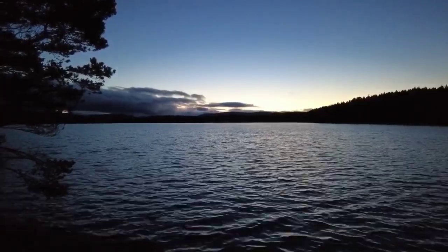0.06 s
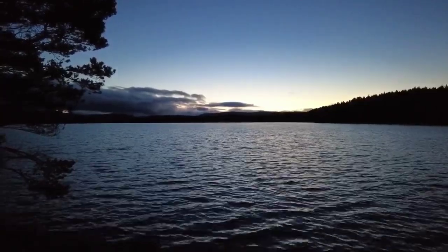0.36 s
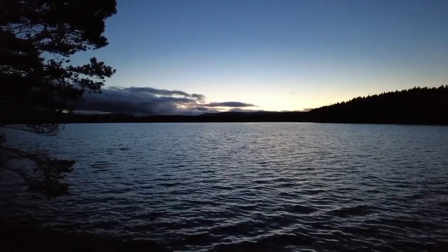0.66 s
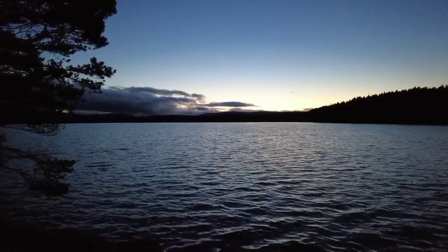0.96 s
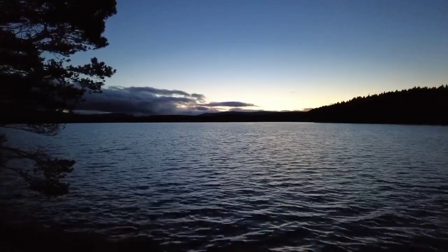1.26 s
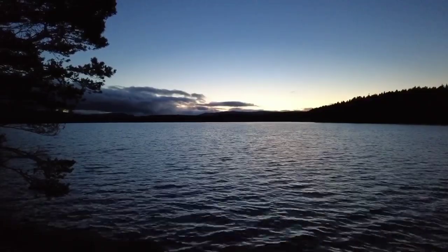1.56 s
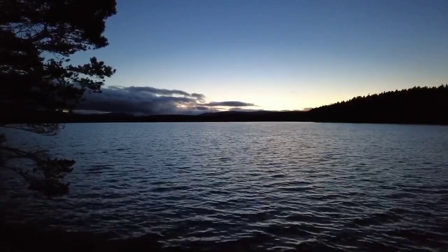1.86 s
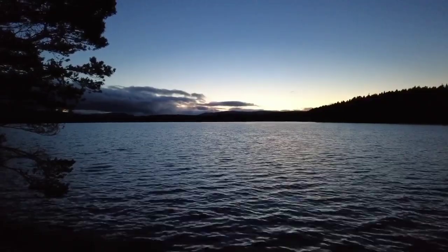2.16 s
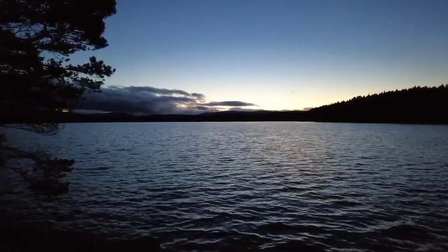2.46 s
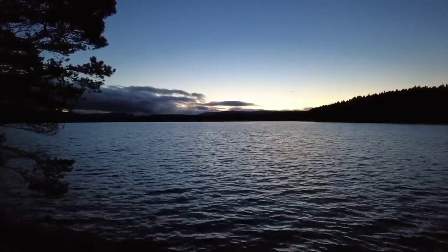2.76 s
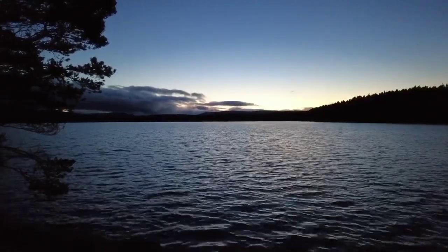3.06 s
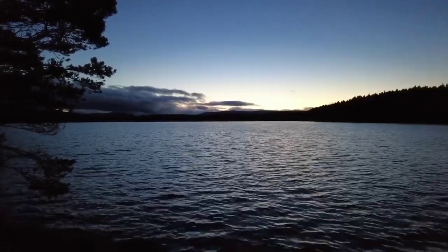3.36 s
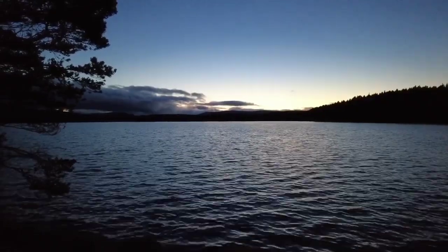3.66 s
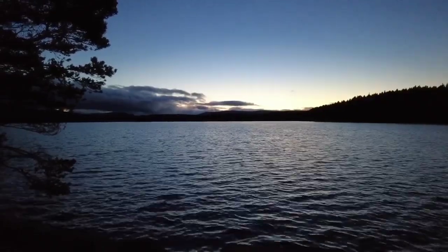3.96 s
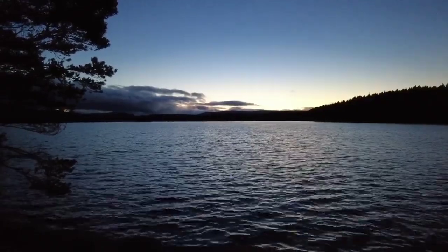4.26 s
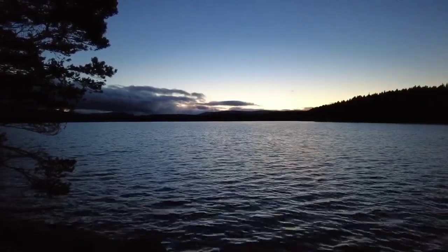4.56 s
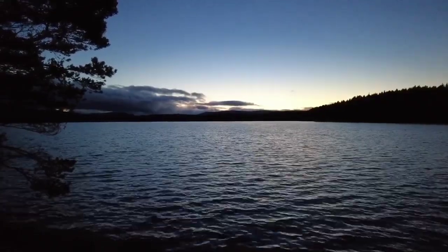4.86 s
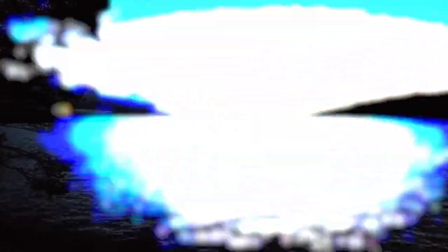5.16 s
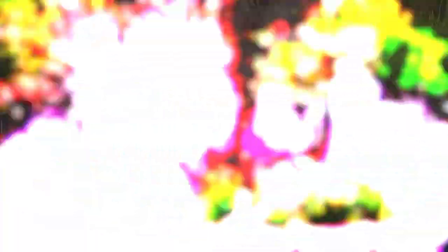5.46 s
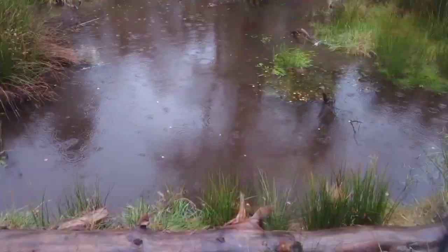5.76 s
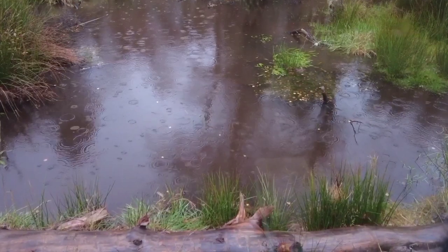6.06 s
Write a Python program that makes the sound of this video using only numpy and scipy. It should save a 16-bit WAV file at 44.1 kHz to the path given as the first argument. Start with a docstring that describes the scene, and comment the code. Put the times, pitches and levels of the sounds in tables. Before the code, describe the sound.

Small lake waves lap close to the microphone, gurgling and plopping among the stones with little splashes. A soft wash of ripples lies farther out, while a breeze hushes faintly in the pines and rumbles on the microphone. The lake cuts off with a brief low thump. After a short silence, light rain ticks and plinks on a pond.

```python
"""Lake shore, then rain on a pond

Close to the microphone small waves gurgle up the stones, trapping air that rings as bubbles; some splash.
Farther out lies a soft wash of ripples. A breeze hushes in the pines and rumbles on the microphone.
The lake cuts off with a brief low thump; after a short silence, light rain ticks and plinks on a pond."""
import sys
import numpy as np
from scipy import signal
from scipy.fft import rfft, irfft, next_fast_len
from scipy.io import wavfile
from scipy.ndimage import uniform_filter1d, map_coordinates

SR = 44100
rng = np.random.default_rng(int(sys.argv[2]) if len(sys.argv) > 2 else 0)


def bounce(signal):
    """Save signal as a 16-bit WAV file at the path given by the first command-line argument."""
    frames = np.transpose(np.atleast_2d(signal))
    limited = np.clip(frames, -1, 1)
    pcm = np.round(limited * 32767).astype(np.int16)
    wavfile.write(sys.argv[1], SR, pcm)


N = 278271
LAKE_END, RAIN_START = 5.313, 5.571  # s

# Small waves running up the shore. Each row: arrival in seconds, strength in dB, seconds on the stones.
WAVES = [(0.06, -57, 0.03), (0.19, -55, 0.082), (0.44, -65, 0.17), (0.72, -58, .04), (1.07, -79, 0.066),
         (1.235, -56.5, 0.025), (1.491, -57.5, 0.034), (1.899, -60.5, 0.11), (2.171, -61.5, 0.13),
         (2.62, -60, 0.11), (2.841, -60, 0.17), (3.16, -58, 0.085), (3.33, -57, 0.06), (3.52, -61.5, 0.022),
         (3.72, -61, 0.041), (3.9, -58.5, 0.054), (4.171, -65, 0.17), (4.565, -59.5, 0.051),
         (4.82, -59, 0.26)]
# Swell and ebb of the water farther along the shore. Each row: time in seconds, level in dB.
WASH_LEVEL = [(0.0, -63.5), (0.3, -67.5), (0.55, -69), (0.72, -65.5), (1.0, -70.5), (1.08, -68.5),
              (1.35, -69), (1.54, -64), (1.76, -77.5), (1.93, -65), (2.1, -68), (2.45, -67), (2.72, -66),
              (3.05, -68.5), (3.2, -66.5), (3.7, -69.5), (4.15, -68), (4.37, -64), (4.48, -78),
              (4.57, -66.5), (4.7, -68.5), (4.93, -63.5), (5.13, -70.5), (5.3, -65)]
# Stereo width at the lake and at the pond. Each row: frequency in Hz, side level against mid in dB.
LAKE_WIDTH = [(40, -27), (110, -14.5), (200, -9.5), (380, -6.5), (700, 1), (980, 10), (1350, -3),
              (2000, -1), (3000, 2.5), (4500, -1.5), (6500, -3), (15000, -4.5)]
POND_WIDTH = [(60, -20), (180, -14), (300, -10), (500, -5.5), (950, 5.5), (1350, -10), (2500, -12),
              (4300, 1.5), (10000, -4.5)]


def plops(brood_db=-14, brood_lag_s=.008, brood_t60=.011, flutter_db=1.5, smack_db=-13, smack_s=.0018):
    """Close by, air pockets shut with a wet smack, then ring on or choke amid a brood of small bubbles."""
    # Large air pockets. Each row: start in seconds, level in dB, pitch in Hz, t60 in seconds,
    # climb in octaves per 20 ms.
    pockets = [(0.0446, -38.5, 1300, 0.0055, -0.055), (0.071, -40, 810, 0.08, 0.23),
               (0.173, -54, 765, 0.15, 0.14), (0.207, -51.5, 1100, 0.044, -0.26),
               (0.263, -53.5, 1025, 0.094, 0.0058), (0.4361, -38, 1423, 0.042, 0.5),
               (0.492, -50, 2130, 0.023, 0.094), (0.537, -53.5, 1620, 0.036, 0.28),
               (0.6923, -44, 1570, 0.0039, 0), (0.6972, -41, 1490, 0.0073, 0),
               (0.736, -47, 1280, 0.013, .2), (1.064, -54, 1373, 0.057, 0.14),
               (1.117, -51.5, 2030, 0.015, .3), (1.145, -56.5, 1800, 0.024, -0.19),
               (1.17, -57, 583, 0.084, 0.091), (1.2, -58, 894, 0.1, 0.3), (1.231, -53, 1980, 0.034, 0.11),
               (1.252, -55.5, 700, 0.1, -0.1), (1.276, -53.5, 1310, .05, .25),
               (1.355, -50.5, 1680, 0.015, 0), (1.4904, -43, 1402, 0.056, 0.099),
               (1.723, -57, 2140, 0.016, .2), (1.85, -53, 1464, 0.037, 0.065),
               (1.902, -49.5, 915, 0.083, 0.36), (1.904, -48, 1270, 0.029, 0.14),
               (1.916, -53, 1300, 0.036, 0.11), (1.952, -53.5, 1006, 0.038, 0.023),
               (1.969, -48, 1240, 0.035, 0), (2.163, -48.5, 1320, 0.015, 0.13),
               (2.486, -52.5, 870, 0.08, 0.088), (2.59, -48.5, 2040, 0.02, -0.096),
               (2.632, -48, 1160, 0.024, 0.24), (2.637, -56, 1600, 0.018, .1),
               (2.839, -46.5, 1320, 0.061, 0.08), (2.858, -49.5, 1670, 0.013, 0),
               (2.891, -47, 1420, 0.035, 0.27), (2.908, -53, 1950, 0.05, 0.16),
               (2.927, -55.5, 2060, 0.018, .2), (2.955, -53.5, 918, 0.074, 0.012),
               (3.075, -49, 1360, 0.0089, 0), (3.122, -54.5, 552, 0.1, 0.19),
               (3.15, -52, 1050, .05, -0.054), (3.166, -51, 1344, 0.04, 0.088),
               (3.172, -37.5, 1404, 0.02, 0.049), (3.185, -50, 1400, 0.036, 0.037),
               (3.215, -54, 814, 0.14, -0.084), (3.247, -55, 1360, 0.046, -0.0044),
               (3.264, -43.5, 1280, 0.017, -0.13), (3.271, -44, 1210, .009, 0),
               (3.451, -58, 2340, 0.021, 0.013), (3.535, -45.5, 1200, 0.022, 0.12),
               (3.646, -53, 422, 0.081, -0.069), (3.721, -50, 1260, 0.05, .1),
               (3.766, -49, 2060, .02, -0.0024), (3.824, -56, 2150, .02, 0.074),
               (3.922, -52, 1270, 0.019, 0.15), (3.952, -51.5, 1390, 0.041, 0.15),
               (4.043, -55.5, 826, 0.094, -0.092), (4.117, -54, 1700, .025, 0.14),
               (4.211, -54, 1840, 0.021, .2), (4.36, -58, 1750, .025, 0.16),
               (4.373, -54, 2010, 0.041, 0.24), (4.573, -52.5, 1030, 0.032, 0.38),
               (4.843, -46, 1235, .045, -0.2), (5.003, -55.5, 1040, 0.048, 0.14),
               (5.006, -59, 2170, .04, -0.062), (5.034, -49.5, 860, 0.037, 0.1),
               (5.082, -52, 1463, 0.054, -0.02), (5.183, -58, 2670, 0.014, 0)]
    # Colour of the smack. Each row: frequency in Hz, relative level in dB.
    smack_spectrum = [(300, -38.5), (800, -14), (1500, 6.5), (2400, -19.5), (4000, -18), (12000, -26)]
    t = np.arange(SR // 20) / SR
    rings, smacks = np.zeros((2, N)), np.zeros((1, N))
    for s, db, hz, t60, rise in pockets:
        ring = bubble(hz, t60, rise, bearing=rng.uniform(-.077, .76), attack_s=.0014, quiver_octaves=.06)
        add(rings, s, amp(db) * ring / np.abs(ring.mean(axis=0)).max())
        choke = np.sqrt(brood_t60 / t60)  # a choked pocket smacks harder than one that rings on
        add(smacks, s, choke * amp(db + smack_db) * t / smack_s * np.exp(1 - t / smack_s))
        for lag, higher, bearing in rng.uniform(-1, 1, size=(5, 3)):
            small = bubble(hz * 1.2 * 1.3 ** higher, brood_t60, rise, bearing)
            add(rings, s + brood_lag_s * (2 * lag + 1), amp(db + brood_db) * small)
    smacks = smacks * rush(smack_spectrum, LAKE_WIDTH, patchy_db=2)
    return (rings + smacks) * unit(amp(flutter_db * wobble(260)))


def splashes(band_octaves=.45, grit_db=2.5, tail_db=-36, tail_t60=.15, spray_gain_db=2, attack_s=.0005):
    """A breaking crest gives a gritty slap around its own pitch and throws spray, which patters back."""
    # Breaking crests. Each row: start in seconds, slap level in dB, slap pitch in Hz,
    # spray level in dB, decay time in seconds.
    crests = [(0.0199, -66, 5000, -61, .004), (0.0448, -54, 1800, -58, 0.0014),
              (0.175, -68, 5500, -65.5, 0.0071), (0.202, -53, 2000, -62.5, 0.0084),
              (0.436, -46, 2300, -68, .0016), (0.6614, -57, 9400, -54.5, 0.0022),
              (0.6925, -34, 2930, -48, 0.0012), (0.696, -38, 3430, -60, .0018),
              (0.743, -53, 2280, -69.5, .005), (0.9558, -51, 6960, -60, .002),
              (1.073, -53, 2200, -67.5, 0.0094), (1.104, -65, 2600, -66.5, .009),
              (1.243, -53, 2400, -75, .004), (1.251, -47.5, 2360, -70, 0.004),
              (1.54, -60, 2200, -65.5, .007), (1.941, -52, 2850, -78, 0.006),
              (2.17, -50, 2020, -56.5, 0.0048), (2.316, -50.5, 2260, -63, 0.0056),
              (2.333, -70, 3000, -60.5, 0.0037), (2.456, -66, 3000, -63, 0.0067),
              (2.589, -54, 2400, -71, 0.0034), (2.633, -58, 1700, -72, .005), (2.67, -65, 3660, -58, .0015),
              (2.692, -62, 2640, -57.5, 0.0033), (2.732, -48, 3070, -57, 0.0045),
              (2.7375, -41, 1920, -61, 0.003), (2.753, -55, 2640, -60, 0.0053),
              (2.8235, -45, 1850, -76, 0.003), (2.86, -53, 2700, -73, .004), (2.955, -60, 1600, -74, .006),
              (2.9828, -64, 3060, -54, 0.0012), (3.001, -50, 2300, -73, 0.003),
              (3.025, -50, 2700, -71, .002), (3.0627, -70, 4000, -55, .0025),
              (3.2607, -50, 1950, -72, .004), (3.469, -54.5, 3000, -74, .004),
              (3.641, -66, 4500, -59, 0.0022), (3.765, -52, 2060, -53, 0.0018),
              (3.8504, -64, 1940, -57.5, 0.0024), (3.921, -49, 1600, -71, 0.0033),
              (3.955, -59, 2000, -63, .003), (4.042, -51.5, 1860, -66, 0.0052),
              (4.174, -54, 2000, -69, 0.0071), (4.246, -56, 2000, -74, .004),
              (4.327, -60, 3500, -60, 0.011), (4.358, -59, 2400, -61.5, 0.008),
              (4.572, -50, 1150, -75, 0.0054), (4.88, -57, 2200, -73, .01), (4.925, -56, 1400, -66, .01),
              (4.94, -62, 2490, -56, 0.0038), (4.972, -66, 4700, -55, .0025), (5.035, -48, 1400, -66, .003),
              (5.2592, -44, 3120, -49.5, 0.0013), (5.2647, -50, 3780, -51, 0.0013)]
    # Colour of the fine spray. Each row: frequency in Hz, relative level in dB.
    spray_spectrum = [(2000, -26), (4500, 8), (6000, 8.5), (7700, 1.5), (10000, -2.5), (15000, -2.5)]
    t = np.arange(SR // 6) / SR
    freqs = np.fft.rfftfreq(len(t), 1 / SR) + 1
    slaps, spray = np.zeros((2, N)), np.zeros((1, N))
    for s, slap_db, hz, spray_db, decay_s in crests:
        burst = (np.exp(-t / decay_s) + amp(tail_db) * decay(t, tail_t60)) * (1 - np.exp(-t / attack_s))
        band = 1 / (1 + (np.log2(freqs / hz) / band_octaves) ** 4)
        noise = unit(irfft(rfft(rng.standard_normal((2, len(t)))) * band, len(t)))
        add(slaps, s, amp(slap_db) * burst * noise)
        add(spray, s, amp(spray_db + spray_gain_db) * burst)
    grit = unit(amp(grit_db * wobble(900)))
    return grit * (slaps + spray * rush(spray_spectrum, LAKE_WIDTH, patchy_db=3))


def pings():
    """Tiny bubbles at the water's edge burst one by one with a high ping."""
    # Bursting bubbles. Each row: start in seconds, level in dB, pitch in Hz.
    bursts = [(0.119, -52, 7600), (0.662, -49, 9300), (0.693, -38.5, 4120), (0.733, -56, 7800),
              (0.9245, -44, 7560), (1.0774, -54, 7540), (1.253, -57, 7600), (3.9564, -50, 7660),
              (4.209, -50, 6200), (4.94, -42, 5880)]
    out = np.zeros((2, N))
    for (s, db, hz), bearing in zip(bursts, rng.uniform(-1, 1, len(bursts))):
        add(out, s, amp(db) * bubble(hz, t60=.011, rise=.02, bearing=bearing))
    return out


def gurgles(first_hz=565, climb_octaves=1.5, length_s=.11, lead_s=.05, gain_db=-7.5, count=10):
    """Each wave squeezes air from under the stones in ever smaller bubbles, so its gurgle climbs."""
    out = np.zeros((2, N))
    for s, db, _ in WAVES:
        for k, (late, higher, louder, bearing) in enumerate(rng.standard_normal((count, 4))):
            progress = (k + .277 * late) / count
            hz = first_hz * 2 ** (climb_octaves * progress + .067 * higher)
            ring = bubble(hz, t60=.05, rise=.28, bearing=.5 * bearing, attack_s=.002)
            add(out, s - lead_s + length_s * progress, amp(db + gain_db + 2 * louder) * ring)
    return out


def lapping(run_up_s=.057, drain_s=.059, calm_db=-73.5):
    """Each wave runs up, churns hollow glugs and a blended froth on the stones, and drains away."""
    t = np.arange(N) / SR
    power = amp(calm_db) ** 2
    for s, db, hold_s in WAVES:
        falloff = np.maximum(s - t, 0) / run_up_s + np.maximum(t - s - hold_s, 0) / drain_s
        power = power + (amp(db) * np.exp(-falloff)) ** 2
    glugs = amp(-14) * swarm(count=200, hz=499.5, octaves=.22, cycles=29, rise=.14, scatter_db=4.5)
    froth = amp(-5) * swarm(count=2000, hz=1450, octaves=.36, cycles=15, rise=.15, scatter_db=4.5)
    return np.sqrt(power) * (glugs + froth)


def near_drops(ring_db=4, tick_db=-4, tick_s=.0032, droplet_db=-6, droplet_lag_s=.012):
    """The raindrops nearest the microphone tick on the pond, ring a trapped bubble and throw droplets."""
    # Nearest drops. Each row: start in seconds, level in dB, pitch of the bubble in Hz.
    drops = [(5.571, -55.5, 4180), (5.582, -52.5, 4320), (5.6017, -50.5, 4070), (5.6329, -52, 4400),
             (5.66, -55, 4600), (5.705, -61.5, 4280), (5.739, -58, 4230), (5.767, -62, 4300),
             (5.8628, -53, 4530), (5.869, -53.5, 4600), (5.9005, -55, 4070), (5.948, -54, 4300),
             (5.9764, -62.5, 4400), (5.9971, -49.5, 4370), (6.005, -53, 4320), (6.015, -58, 4100),
             (6.0413, -53.5, 4600), (6.0762, -56, 4500), (6.0897, -50.5, 4240), (6.1641, -51.5, 4500),
             (6.187, -51, 4320), (6.2253, -50.5, 3930), (6.26, -50, 4400), (6.274, -51.5, 4250)]
    # Colour of the impact on the water. Each row: frequency in Hz, relative level in dB.
    tick_spectrum = [(600, -9.5), (1500, 8.5), (2800, 2.5), (4300, 5), (5600, -11), (12000, -27.5)]
    t = np.arange(SR // 50) / SR
    rings, ticks = np.zeros((2, N)), np.zeros((1, N))
    for (s, db, hz), bearing in zip(drops, rng.uniform(-1, 1, len(drops))):
        add(ticks, s, amp(db + tick_db) * np.exp(-t / tick_s))
        ring = bubble(hz, t60=.014, rise=.02, bearing=1.1 * bearing, quiver_octaves=.05)
        add(rings, s, amp(db + ring_db) * ring)
        for lag, higher, side in rng.uniform(-1, 1, size=(3, 3)):
            droplet = bubble(hz * 2 ** (.19 * higher), t60=.009, rise=.02, bearing=side)
            add(rings, s + droplet_lag_s * abs(lag), amp(db + droplet_db) * droplet)
    return rings + ticks * rush(tick_spectrum, POND_WIDTH, patchy_db=2.5)


def patter(flutter_db=3.5):
    """Farther out on the pond, a dense shower ticks and plinks as its drops trap bubbles."""
    shower = RAIN_START, N / SR
    ticks = swarm(count=700, hz=2630, octaves=.46, cycles=8.9, rise=0, scatter_db=3, span=shower)
    plinks = swarm(count=1200, hz=4330, octaves=.1, cycles=12, rise=.02, scatter_db=7, span=shower)
    return (amp(-73) * ticks + amp(-74) * plinks) * unit(amp(flutter_db * wobble(130)))


def wind(split_hz=70, deep_gain_db=.55, upper_gain_db=-1):
    """Eddies press on the microphone, nearly alike in both channels; a brief low thump marks where the lake
    sound cuts off."""
    # Rumble levels. Each row: time in seconds, level of the deep band in dB, of the upper band in dB.
    # The last row is the brief low thump as the lake sound cuts off.
    levels = [(0.0, -35.5, -51), (0.045, -29.5, -38), (0.09, -32.5, -47.5), (0.21, -40, -54),
              (0.34, -33.5, -50), (0.5, -41.5, -47), (0.57, -37.5, -57.5), (0.8, -36.5, -50.5),
              (0.9, -43, -60), (1.14, -36, -52), (1.18, -41.5, -50.5), (1.34, -33, -52.5),
              (1.46, -38, -62.5), (1.61, -31.5, -54), (1.71, -40.5, -54), (1.87, -34.5, -57),
              (2.01, -36, -45.5), (2.06, -28.5, -46.5), (2.2, -32, -50.5), (2.29, -43.5, -49.5),
              (2.36, -28, -53), (2.58, -46.5, -60.5), (2.66, -33.5, -46.5), (2.88, -42, -55.5),
              (3.15, -36, -51.5), (3.35, -41.5, -52.5), (3.7, -34.5, -50.5), (3.81, -41, -65),
              (4.04, -33, -50.5), (4.24, -41, -57.5), (4.31, -27.5, -46.5), (4.38, -38, -49.5),
              (4.47, -29, -50), (4.56, -37, -55.5), (4.92, -31.5, -48.5), (5.1, -35.5, -45.5),
              (5.28, -34, -44), (5.305, -33.5, -37.5)]
    # Colour of the rumble. Each row: frequency in Hz, relative level in dB.
    spectrum = [(12, -22), (22, 2.5), (30, -0.5), (48, -4), (70, -13.5), (100, -21.5), (150, -37),
                (250, -50), (500, -54), (1500, -100)]
    deep_db, upper_db = curves(levels)
    noise = rush(spectrum, LAKE_WIDTH, patchy_db=1)
    deep = filtered(noise, lambda hz: 1 / (1 + (hz / split_hz) ** 6))
    levelled = lambda x: x / np.sqrt(np.abs(uniform_filter1d(x[0] ** 2, size=6000)))
    rumble = amp(deep_db + deep_gain_db) * unit(amp(.77 * wobble(21.79))) * levelled(deep)
    flutter = amp(upper_db + upper_gain_db + wobble(30)) * levelled(noise - deep)
    return rumble + flutter


def fizz(gain_db=-9):
    """Tiny bubbles burst in the wash, swelling and ebbing with it."""
    wash_db, = curves(WASH_LEVEL)
    bubbles = swarm(count=1000, hz=4340, octaves=.613, cycles=8.1, rise=.079, scatter_db=6)
    return amp(wash_db + gain_db) * bubbles


def wash(flutter_db=2):
    """Ripples farther along the shore blend into a soft wash."""
    # Colour of the wash. Each row: frequency in Hz, relative level in dB.
    spectrum = [(500, -25), (1000, -5.5), (1400, 10.5), (2300, 1.5), (3200, 2.5), (6000, -6),
                (10000, -11.5), (15500, -16)]
    wash_db, = curves(WASH_LEVEL)
    return amp(wash_db + flutter_db * wobble(22.26)) * rush(spectrum, LAKE_WIDTH, patchy_db=2)


def distant_rain():
    """Rain far from the microphone merges into a blur."""
    # Colour of the blur. Each row: frequency in Hz, relative level in dB.
    spectrum = [(25, 5), (90, 1), (200, -6), (290, 2.5), (420, -7.5), (600, -4.5), (730, -11), (850, -16),
                (1100, -14), (1400, -8), (2300, -21.5), (3700, -19.5), (4400, -18.5), (5600, -32),
                (12000, -39), (15000, -55.5)]
    return amp(-55.5) * rush(spectrum, POND_WIDTH, patchy_db=3)


def breeze():
    """The steady hush of the breeze over the lake and in the pines."""
    # Colour of the hush. Each row: frequency in Hz, relative level in dB.
    spectrum = [(100, -7.5), (170, -2.5), (310, -4.5), (450, -12), (750, -16.5), (1050, -30), (1400, -25),
                (2300, -33), (5500, -24.5), (8000, -28.5), (10000, -32), (12500, -34.5), (15500, -33.5)]
    return amp(-62.5) * rush(spectrum, LAKE_WIDTH, patchy_db=2)


def shore(x, t60, wet_db):
    """Stones and the bank scatter a short diffuse tail after each sound."""
    t = np.arange(SR // 4) / SR
    tail = rng.standard_normal((2, len(t))) * decay(t, t60) * (1 - np.exp(-t / .003))
    return x + amp(wet_db) * signal.fftconvolve(x, tail / np.linalg.norm(tail[0]), axes=1)[:, :N]


def bubble(hz, t60, rise, bearing, attack_s=.00076, quiver_octaves=0):
    """A damped air pocket; nearing the surface, its pitch climbs rise octaves per 20 ms, for up to 40 ms."""
    t = np.arange(int(np.clip(t60, .002, .1) * SR)) / SR
    pitch = hz * 2 ** (rise * (np.minimum(t, .04) - t60 / 10) / .02)
    if quiver_octaves:  # the pitch quivers as the bubble changes shape
        shape = np.interp(t, np.linspace(0, .1, 80), rng.standard_normal(80))
        pitch = pitch * 2 ** (quiver_octaves * shape)
    phase = 2 * np.pi * np.cumsum(pitch) / SR
    mid = np.sin(phase)
    side = bearing * amp(along(LAKE_WIDTH, hz)) * np.cos(phase)  # shifts the phase between the channels
    return np.array([mid + side, mid - side]) * decay(t, t60) * (1 - np.exp(-t / attack_s))


def swarm(count, hz, octaves, cycles, rise, scatter_db, span=(0, LAKE_END)):
    """Small bubbles of random time, pitch, life, level and bearing; rms 1 over the span in seconds."""
    out = np.zeros((2, N))
    starts = rng.uniform(*span, count)
    traits = np.clip(rng.standard_normal((count, 4)), -2, 2)
    for s, (higher, longer, louder, bearing) in zip(starts, traits):
        pitch = min(hz * 2 ** (octaves * higher), SR / 4)
        t60 = cycles / pitch * 2 ** (longer / 2)
        add(out, s, amp(scatter_db * louder) * bubble(pitch, t60, rise, bearing))
    return unit(out) * np.sqrt((span[1] - span[0]) * SR / N)


def rush(spectrum, width, patchy_db):
    """Stereo noise with patches of random gain in time and frequency; its mid has rms 1."""
    cells = signal.stft(rng.standard_normal((2, N)), nperseg=512)[2]
    patches = uniform_filter1d(rng.standard_normal(cells.shape[1:]), size=6, axis=0)
    patches = uniform_filter1d(patches, size=5, axis=1)
    noise = signal.istft(cells * amp(patchy_db * unit(patches)), nperseg=512)[1][:, :N]
    mid = filtered(noise[0], lambda hz: amp(along(spectrum, hz)))
    side = filtered(noise[1], lambda hz: amp(along(spectrum, hz) + along(width, hz)))
    return np.array([mid + side, mid - side]) / mid.std()


def amp(db):
    """Decibels to gain."""
    return 10 ** (np.asarray(db) / 20)


def unit(x):
    """Scale to rms 1."""
    return x / np.sqrt(np.mean(x ** 2) + 1e-20)


def decay(t, t60):
    """An envelope that falls 60 dB in t60 seconds."""
    return np.exp(-np.log(1000) * t / t60)


def along(points, hz):
    """Interpolate (Hz, value) points on a log frequency axis."""
    freqs, values = np.transpose(points)
    return np.interp(np.log(hz + 1), np.log(freqs + 1), values)


def curves(rows):
    """One value per sample for each column after the time."""
    times, *columns = np.transpose(rows)
    return [np.interp(np.arange(N) / SR, times, column) for column in columns]


def wobble(rate):
    """A smooth random curve, rate knots a second."""
    return map_coordinates(rng.standard_normal(int(N * rate / SR) + 4), [np.arange(N) * rate / SR])


def filtered(x, response):
    """Filter x by a gain that is a function of frequency in Hz."""
    size = next_fast_len(N + SR // 2)
    return irfft(rfft(x, size) * response(np.fft.rfftfreq(size, 1 / SR)), size)[..., :N]


def add(track, s, sound):
    """Mix a sound into the track from s seconds on."""
    part = track[:, max(round(s * SR), 0):][:, :sound.shape[-1]]
    part += sound[..., :part.shape[-1]]


def scene():
    """The microphone at the lake's edge, a gap of silence, then beside the pond."""
    t = np.arange(N) / SR
    close_water = shore(plops() + splashes() + pings(), t60=.16, wet_db=-10)
    churn = lapping() + fizz()
    far_water = wash()
    ripples = shore(churn + gurgles(), t60=.073, wet_db=-6)
    lake = close_water + ripples + far_water + breeze() + wind()
    drops = near_drops() + patter()
    pond = distant_rain() + shore(drops, t60=.03, wet_db=-1.5)
    fade = lambda s: np.clip(s / .003, 0, 1)
    return lake * fade(t) * fade(LAKE_END - t) + pond * fade(t - RAIN_START)


def record(dry):
    """The recorder keeps nothing above its band limit of 15.7 kHz."""
    return filtered(dry, lambda hz: hz < 15700)


dry = scene()
out = record(dry)
bounce(out)
```